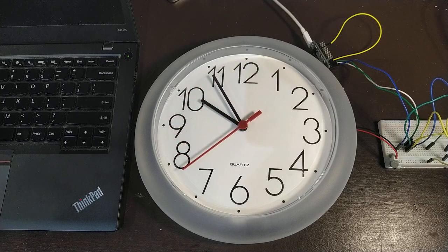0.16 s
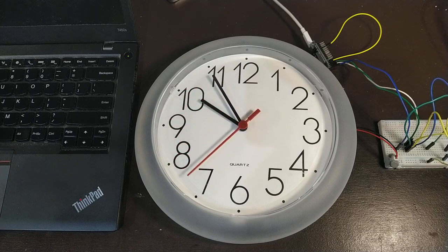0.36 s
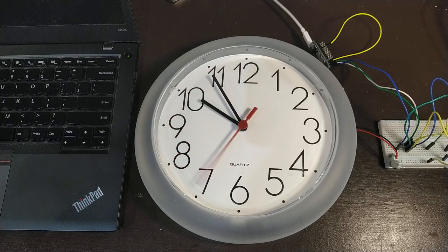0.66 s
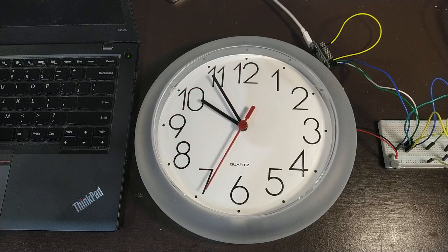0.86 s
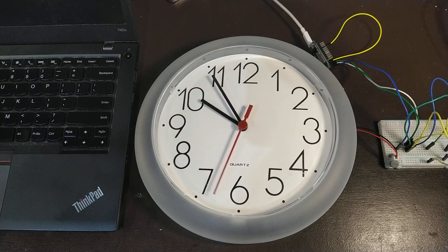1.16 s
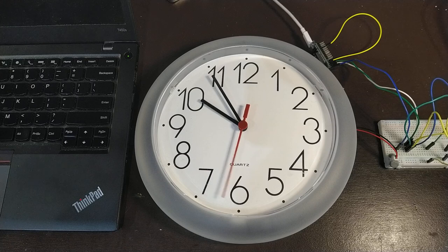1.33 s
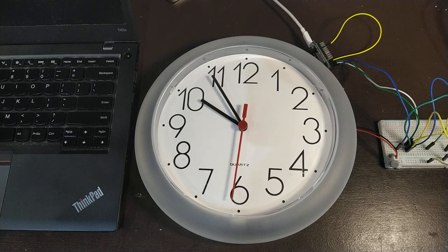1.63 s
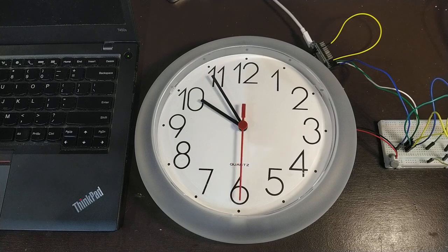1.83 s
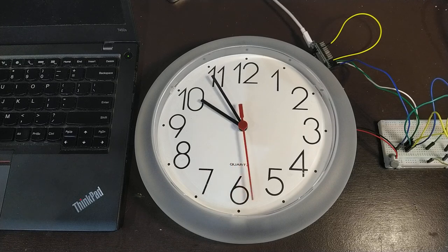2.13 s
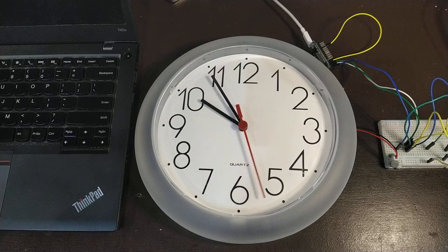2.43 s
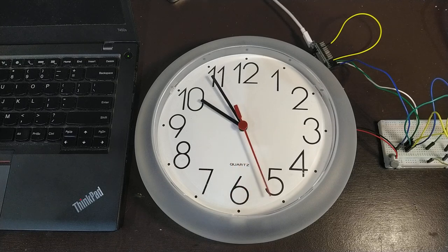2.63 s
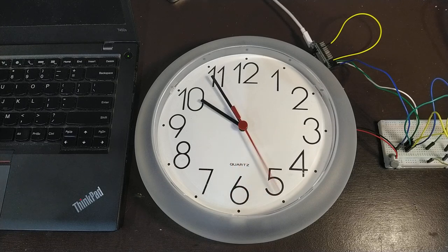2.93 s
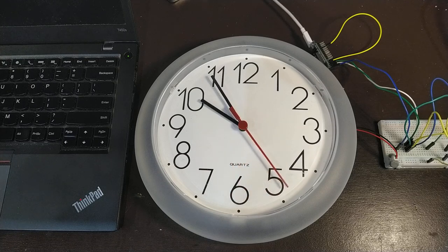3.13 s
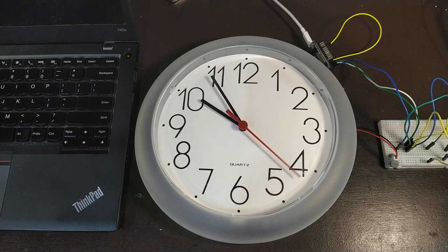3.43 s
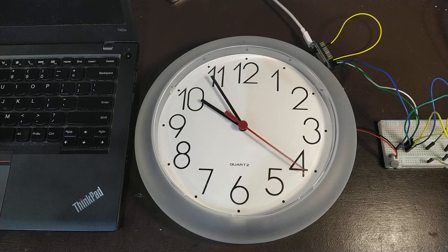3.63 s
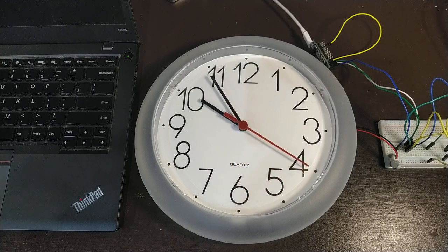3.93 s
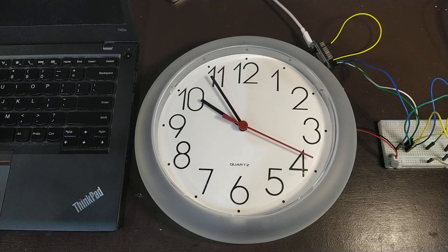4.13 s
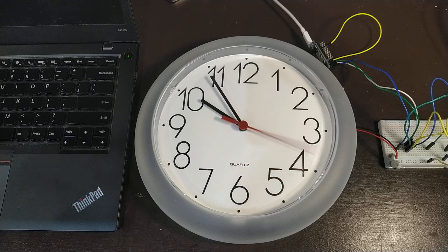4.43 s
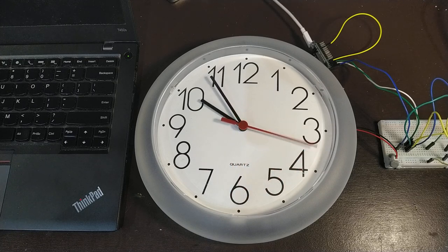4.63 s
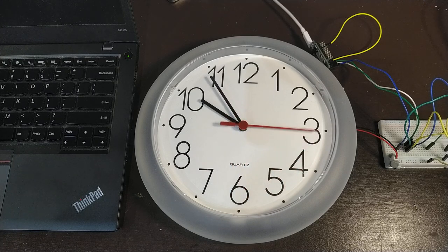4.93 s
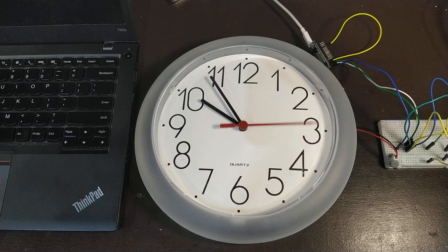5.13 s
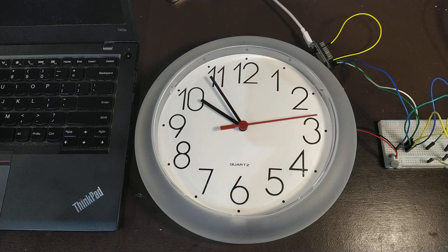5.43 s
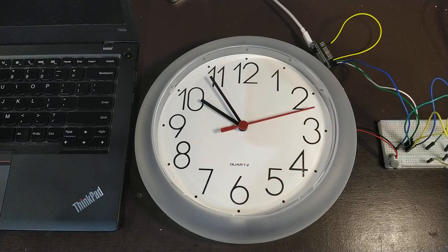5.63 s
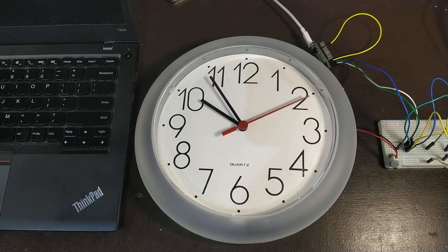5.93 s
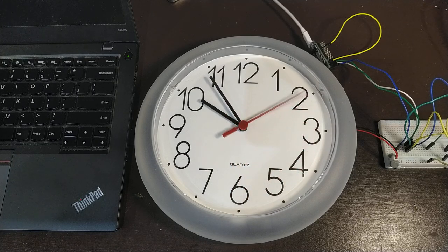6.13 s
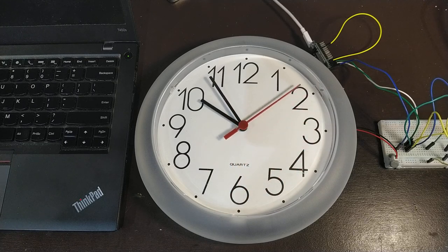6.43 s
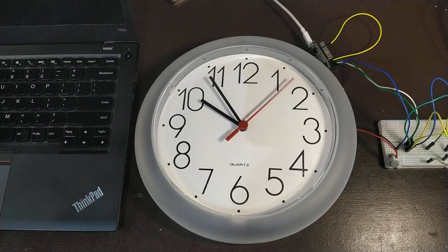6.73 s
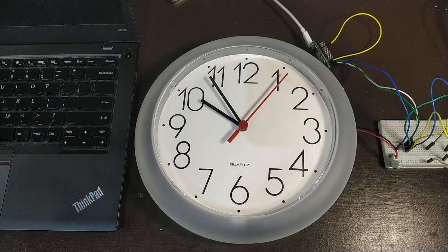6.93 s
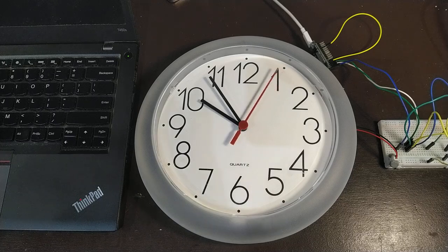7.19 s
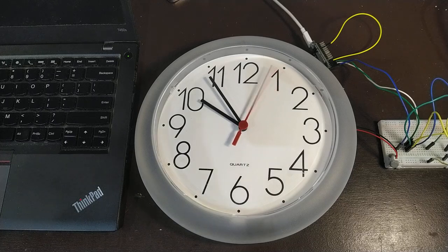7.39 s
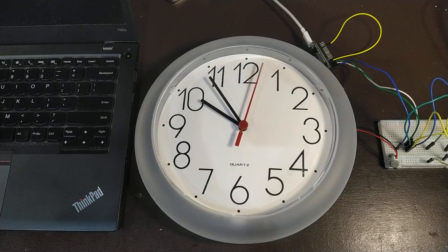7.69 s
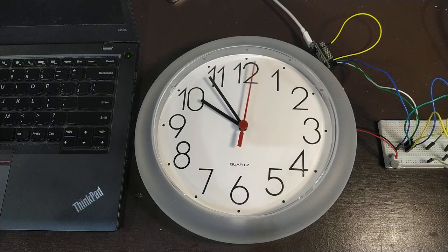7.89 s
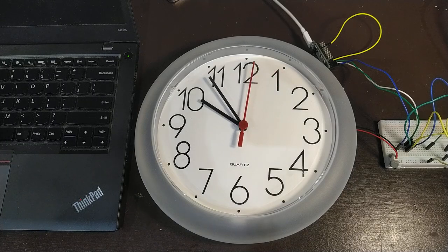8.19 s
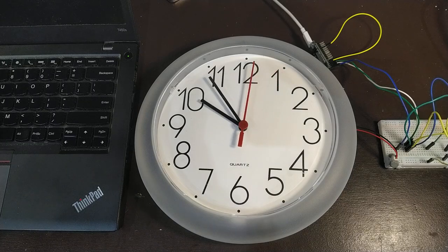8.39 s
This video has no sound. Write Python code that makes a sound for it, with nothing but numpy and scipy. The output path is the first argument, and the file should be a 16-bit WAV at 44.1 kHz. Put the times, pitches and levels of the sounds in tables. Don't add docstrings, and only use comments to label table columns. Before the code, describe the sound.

Fast steady ticking of a plastic clock mechanism, each tick a tiny rattling triple click, in a quiet rumbling room, ending just before the close.

```python
import sys
import numpy as np
from scipy import signal
from scipy.fft import rfft, irfft, next_fast_len
from scipy.io import wavfile
from scipy.ndimage import map_coordinates

SR = 44100
rng = np.random.default_rng(int(sys.argv[2]) if len(sys.argv) > 2 else 0)


def volts_from_db(level):
    exponent = np.asarray(level, float) / 20
    return 10 ** exponent


def persist_wave(psi):
    counts = np.round(np.clip(psi, -1, 1) * 32767).astype(np.int16)
    wavfile.write(sys.argv[1], SR, np.atleast_2d(counts).T)


N = 377055


def unit(x):
    return x / np.sqrt(np.mean(x ** 2) + 1e-20)


def along(points, hz):
    f, value = np.transpose(points)
    return np.interp(np.log(hz + 1), np.log(f + 1), value)


def curves(rows):
    t, *columns = np.transpose(rows)
    return [np.interp(np.arange(N) / SR, t, column) for column in columns]


def wobble(rate):
    knots = rng.standard_normal(int(N * rate / SR) + 4)
    return map_coordinates(knots, [np.arange(N) * rate / SR])


def filtered(x, response):
    m = next_fast_len(N + SR // 2)
    return irfft(rfft(x, m) * response(np.fft.rfftfreq(m, 1 / SR)), m)[:N]


def tone(hz, db):
    return np.sqrt(2) * volts_from_db(db) * np.sin(2 * np.pi * np.cumsum(hz) / SR)


def shaped_noise(shape):
    return unit(filtered(rng.standard_normal(N), lambda hz: volts_from_db(along(shape, hz))))


def background():
    # f/Hz, level/dB per Hz
    rumble_band = [(5, -33), (8, 7.5), (16, 9.5), (24, -4), (45, -8), (60, -9.5), (90, -52)]
    # f/Hz, level/dB per Hz
    hiss_band = [(100, -23), (200, -3.5), (350, -9), (670, -18), (1500, -27.5), (3700, -34.5), (4100, -33),
                 (7400, -37), (9000, -37.5)]
    # f/Hz, level/dB per Hz
    drone_band = [(35, -32), (55, -3.5), (75, -1), (100, -6), (125, -10.5), (145, -9.5), (190, -19),
                  (300, -56.5)]
    # t/s, level/dB
    drone_level = [
        (0.0, -59),
        (2.12, -56.5),
        (2.26, -58),
        (8.17, -58),
        (8.55, -55),
    ]
    # f/Hz, rms level/dB, wander/Hz, waver/dB
    hum_lines = [
        (30.5, -56.5, 0.13, -3.5),
        (41.25, -60, 1.2, 3.5),
    ]
    # t/s, firing f/Hz, rms level/dB
    engine_run = [
        (.9, 74, -61.5),
        (1.5, 79, -65),
        (2, 86, -55.5),
        (2.5, 92, -73.5),
        (3, 98, -61.5),
        (3.6, 103, -63.5),
        (4.1, 99, -63),
        (4.5, 88, -87),
    ]
    rumble = volts_from_db(-51.5 + 1.8 * wobble(0.83)) * shaped_noise(rumble_band)
    hums = 0
    for hz, db, wander, waver_db in hum_lines:
        hums = hums + tone(hz + wander * wobble(3.4), db + waver_db * wobble(5.0))
    drone = volts_from_db(curves(drone_level)[0] + 0.12 * wobble(0.75)) * shaped_noise(drone_band)
    engine = tone(*curves(engine_run))
    hiss = volts_from_db(-66.5 + 0.47 * wobble(3.2)) * shaped_noise(hiss_band)
    return rumble + hums + drone + engine + hiss


def contacts():
    # t/s of first blow, first,
    # second and third blow level/dB, case knock/dB above the click
    step_blows = [(0.0526, -52, -50, -51, 1), (0.2643, -51, -54.0, -53, 2.5), (0.4741, -55.5, -54.5, -54.0, 6),
                  (0.6853, -57.5, -49, -51.5, 1), (0.8956, -50.5, -53, -54.0, 3),
                  (1.1097, -51.5, -49, -55, 0.5), (1.3186, -51.5, -48.5, -56, 2.5),
                  (1.5315, -55, -48.5, -52.0, -1), (1.7405, -56, -48, -63.5, 6.5),
                  (1.9505, -58, -50.5, -54.5, 4),
                  (2.162, -52.5, -54.0, -51, 0), (2.3735, -54.5, -50.5, -57, 5), (2.5868, -56, -48, -52.5, 3),
              (2.7908, -54.5, -49.5, -53.5, 3.5), (3.0016, -55.5, -51.5, -57, 1.0),
              (3.2144, -60, -51.0, -51, 5), (3.4256, -52, -50.5, -63, 0), (3.6368, -59, -52.5, -48.5, 1),
              (3.8485, -53, -52.5, -54.5, 3.0), (4.0589, -57, -49, -55, 2), (4.2695, -51, -55.5, -53, 2.5),
              (4.4815, -52, -50.5, -53, 0), (4.6938, -50, -51, -58, 0.5), (4.9038, -50.5, -48.5, -54, 0.0),
              (5.1174, -51.0, -48.5, -55, -1), (5.325, -56, -51, -49, 0), (5.5433, -51, -50, -55, 1.5),
              (5.7445, -52, -59, -57.0, -1), (5.958, -53, -53.5, -62, 1), (6.1642, -53, -55, -55.5, 3.5),
              (6.3807, -49.5, -50.0, -58, -1.5),
                  (6.5897, -52, -52, -53, 7),
        (6.801, -53, -51, -51, 1),
                  (7.0117, -54, -54.0, -55.5, 2.5),
        (7.2244, -50.0, -55, -52, 1.5),
        (7.436, -50.5, -53.5, -54.5, 1.0),
        (7.647, -49, -61, -58, 1.5),
        (7.8619, -54.5, -51.5, -53.5, 6),
    ]
    # t/s after the first blow, level/dB re step, knock/dB re step
    touch_pattern = [
        (-.020, -14.5, -2.5),
        (-.010, -17, 5.5),
        (.008, -17, 5.5),
        (0.027, -12, 3.5),
    ]
    # t/s, level/dB
    slack = [
        (0, 0.5),
        (1.3, 1),
        (2.6, -2),
        (3.6, -0.3),
        (4.6, -3),
        (5.6, 1.1),
        (6.2, 4),
        (7.3, 4),
        (8.0, -2.5),
    ]
    # t/s, click level/dB, knock/dB
    catches = [(0.0294, -62, -1), (0.2427, -57.5, -11), (0.922, -57, -7), (0.961, -54, 4),
               (1.2055, -59, -9.0), (1.387, -53.5, 3), (1.555, -49, 0.5), (1.6553, -59, 7.5),
               (1.8073, -48.5, -5), (1.9766, -49, -0.5), (2.027, -55.5, 0), (2.217, -58, 2),
               (2.2437, -65, -9), (2.2656, -61.5, 8), (2.3984, -48.5, -4), (2.4168, -56, 4),
               (2.6436, -57, -3), (2.6542, -51, 1), (3.028, -51, 3), (3.2606, -54.0, -4), (3.3393, -59, 0),
               (3.9073, -51, -18), (4.7484, -56, 4), (5.5874, -56, -7.0), (5.7318, -57.0, -8),
               (6.4432, -57, -15.0), (7.0656, -55, -10), (7.723, -59.5, 10.5), (7.8452, -55, -9),
               (7.9277, -58, 4)]
    # t/s, click level/dB, knock/dB
    knocks = [(0.035, -66, 12.5), (0.2808, -56.5, 1), (0.57, -61, 9), (0.7075, -63.5, 17), (1.3925, -58, 3),
              (1.5339, -62.5, 15.5), (1.7702, -63, 11), (1.9773, -48.5, -6), (2.1894, -46.5, 0),
              (2.225, -53.5, 6.5), (2.267, -65, 0), (2.386, -57, -7), (2.437, -59, 7), (2.5437, -66, 12.5),
              (2.6547, -63, -2.0), (2.8105, -56.0, 7), (3.242, -61, -2), (3.454, -57, 13.5),
              (3.4635, -58, 3.5), (5.1478, -57, 10.5), (7.5087, -59.0, 10.5), (7.664, -58, 9.5),
              (7.723, -60.5, 7), (7.9084, -63, 13.5)]
    # t/s, click level/dB, knock/dB
    rattles = [(0.1606, -59, -2), (0.4063, -61.5, 9), (.4526, -62, 5), (.5841, -63, -9),
               (.6643, -58.5, 2.5), (0.807, -65, -7), (.8207, -63.5, 10), (1.0036, -59, 7),
               (1.0852, -64, 4), (1.2621, -67, 5), (1.4627, -66.5, 7.5), (1.6973, -73, 12),
               (1.8537, -65, 14.5), (2.0703, -64.5, 11), (2.4807, -59.5, 4), (3.0702, -57, -3),
               (3.2248, -53, 0), (3.355, -66.5, 11), (3.4848, -52, -15), (3.7806, -61.5, 5.5),
               (4.1477, -57.5, -4), (4.3513, -57.5, 0), (4.671, -62.5, 1), (4.812, -66, 7),
               (5.011, -66, 10), (5.4156, -63.5, 8.5), (5.4357, -70, 17), (5.8262, -65, 15),
               (7.1182, -72, 3.5), (7.3604, -64.5, 10)]

    steps = np.array(step_blows)
    start, blow_db, knock = steps[:, :1], steps[:, 1:-1], steps[:, -1:]
    step_db = blow_db.mean(axis=1, keepdims=True)
    swing_scatter_s = 0.0012

    def chance(count):
        return rng.standard_normal((3, len(steps), count))

    late, _, dull = chance(3)
    blow_t = start + [0, 0.0155, 0.034] + swing_scatter_s * late * [0, 1, 1]
    blows = (blow_t, blow_db, knock - 1.5 + 2.5 * dull)

    after, under_db, touch_knock = np.transpose(touch_pattern)
    late, loud, dull = chance(len(touch_pattern))
    touches = (start + after + swing_scatter_s * late,
               step_db + under_db + 4.5 * loud,
               knock + touch_knock + 2.8 * dull)

    late, loud, dull = chance(8)
    since = 0.015 * (np.arange(late.shape[1]) + 0.3 * late)
    loudness_db = 4.5 * loud
    slack_db = np.interp(start, *np.transpose(slack))
    rebounds = (start + 0.048 + since,
                step_db - 8 + slack_db - 165.5 * since + loudness_db,
                knock + 2.5 + 38.5 * since - loudness_db / 2 + 2.5 * dull)

    ruled = [np.reshape(group, (len(group), -1)) for group in (blows, touches, rebounds)]
    stray = [np.transpose(group) for group in (catches, knocks, rattles)]
    return np.hstack([*ruled, *stray])


def scrape(times, level_db, rise, fall):
    start = np.maximum(np.round((times - 2 * rise) * SR), 0).astype(int)
    power = np.bincount(start, volts_from_db(level_db) ** 2, N)[:N]
    t = np.arange(SR // 5) / SR
    shape = (1 - np.exp(-t / rise)) ** 4 * np.exp(-t / fall)
    return np.abs(signal.oaconvolve(power, shape / shape.max())[:N])


def ringing(x, modes):
    def body(f):
        total = 0
        for k, (center, width, db) in enumerate(modes):
            damping = 1j * f * width
            total = total + (-1) ** k * volts_from_db(db) * damping / (center * center - f * f + damping)
        return total

    return filtered(x, lambda f: body(f) / np.sqrt(np.mean(np.abs(body(f)) ** 2)))


def gears():
    # f/Hz, width/Hz, level/dB
    rotor_modes = [(1460, 120, -7), (1797, 191, 3), (1910, 280, -6), (3610, 110, -8)]
    movement_modes = [(2440, 520, -4), (2867, 150, 1.5), (3130, 155, 0), (3300, 62, -4.5)]
    wheel_modes = [(4260, 290, -26.5), (5226, 110, 4), (6050, 860, -2), (6580, 240, 4), (7500, 910, -2.5)]
    dial_modes = [(891, 140, -8.5), (1066, 67, -2.5), (1184, 59, -1), (1345, 88, -4.5)]
    case_modes = [(285, 34, -5), (431.4, 97, 2), (588, 398, -3), (761, 140, -3)]
    # t/s, level/dB
    hand_load = [
        (0, -2.5),
        (1.2, -2),
        (2.5, -1),
        (4, -4),
        (5.5, -3),
        (8.55, -2),
    ]
    t, click, knock = contacts()
    spot = rng.standard_normal((len(t), 3))
    grit, slips = unit(volts_from_db(2.1 * wobble(900))), unit(volts_from_db(3 * wobble(300)))

    def part(modes, db, rise, fall, chatter_db, chatter_fall):
        blow = scrape(t, db, rise, fall)
        play = scrape(t - 0.004, db - 16, rise=0.004, fall=0.003)
        loose = play + scrape(t, db + chatter_db, 0.004, chatter_fall)
        force = np.sqrt(blow * grit ** 2 + loose * slips ** 2)
        return ringing(force * rng.standard_normal(N), modes)

    rotor = part(rotor_modes, click - 3.0,
                 rise=0.0012, fall=0.0011, chatter_db=-21.5, chatter_fall=0.021)
    movement = part(movement_modes, click + 2.0 * spot[:, 2] - 7.5,
                    rise=0.0015, fall=0.0017, chatter_db=-9.0, chatter_fall=0.015)
    wheels = part(wheel_modes, click + 2 * spot[:, 0] - 8.5,
                  rise=0.0013, fall=0.0015, chatter_db=-9.0, chatter_fall=0.01)
    dial = part(dial_modes, click + knock - 6.5,
                rise=0.0012, fall=0.0049, chatter_db=-9.5, chatter_fall=0.018)
    case = part(case_modes, click + 0.8 * knock + 0.84 * spot[:, 1] - 8.5,
                rise=0.0019, fall=0.0055, chatter_db=-8.0, chatter_fall=0.032)
    return rotor + volts_from_db(curves(hand_load)[0]) * (movement + wheels) + dial + case


def room(x):
    # f/Hz, T60/s
    decay = [(300, 0.52), (1500, 0.22), (7000, 0.27)]
    hz, t, z = signal.stft(rng.standard_normal(SR // 2), SR, nperseg=256)
    fading = z * volts_from_db(-60 * t / along(decay, hz)[:, None])
    tail = signal.istft(fading, SR, nperseg=256)[1]
    delayed = np.pad(x, (200, 0))
    return signal.fftconvolve(delayed, tail / np.linalg.norm(tail))[:N]


def scene():
    clock = gears()
    return (clock + volts_from_db(-12.5) * room(clock) + background())[None]


def roll_off(x):
    return signal.sosfilt(signal.butter(12, 8410, fs=SR, output="sos"), x)


def record(dry):
    # f/Hz, level/dB
    band_edge = [(7400, -0.5), (7900, -10.5), (8300, -15.5), (8600, -62)]
    narrow = filtered(dry[0], lambda hz: volts_from_db(along(band_edge, hz)))
    return roll_off(narrow[None])


dry = scene()
out = record(dry)
persist_wave(out)
```